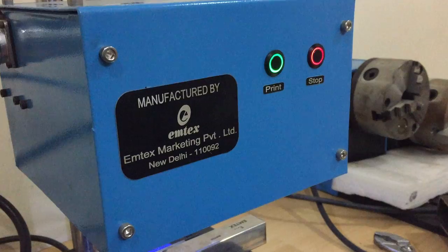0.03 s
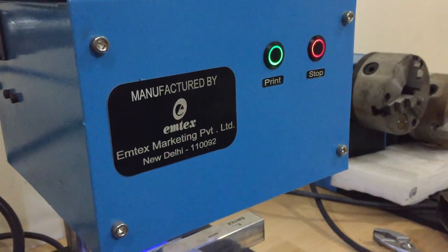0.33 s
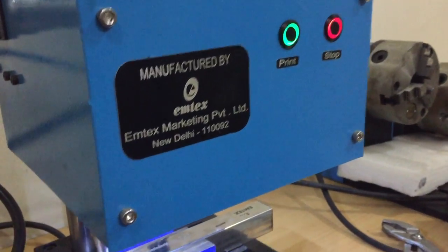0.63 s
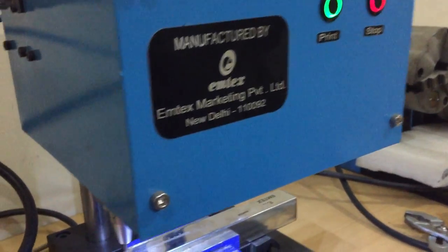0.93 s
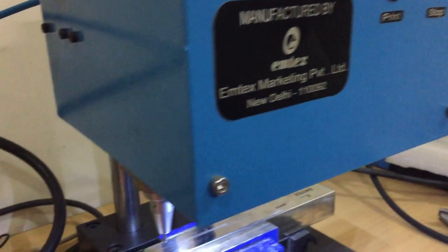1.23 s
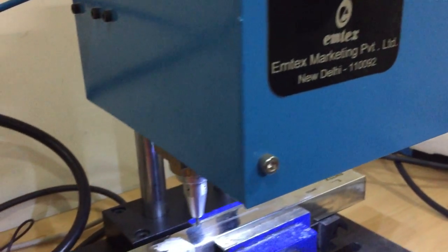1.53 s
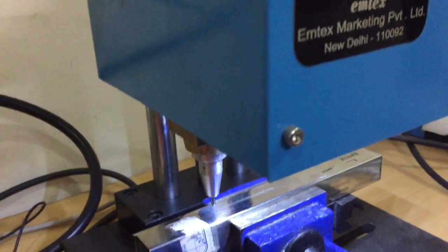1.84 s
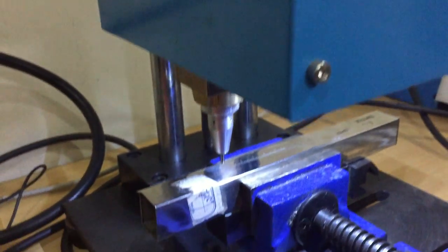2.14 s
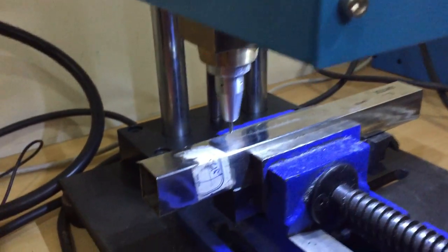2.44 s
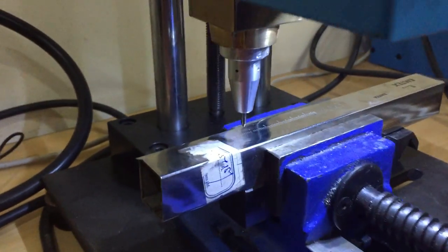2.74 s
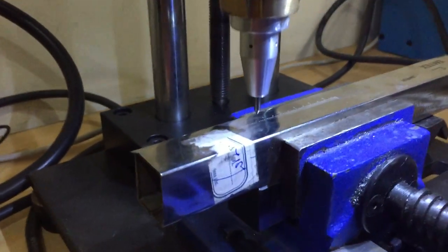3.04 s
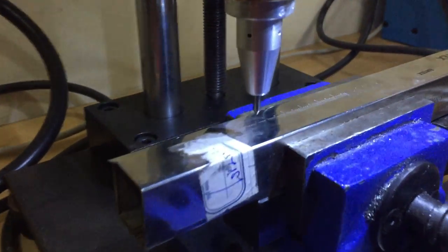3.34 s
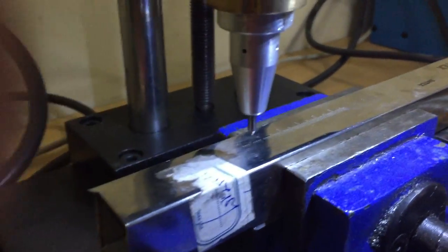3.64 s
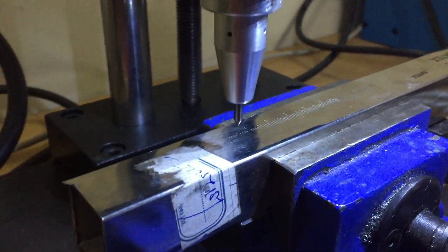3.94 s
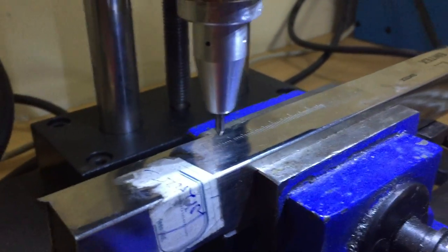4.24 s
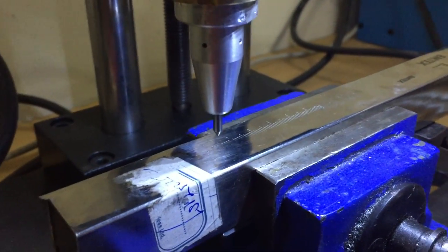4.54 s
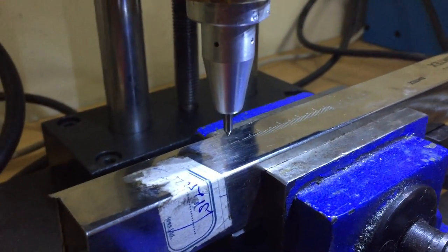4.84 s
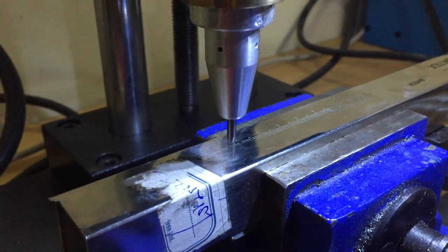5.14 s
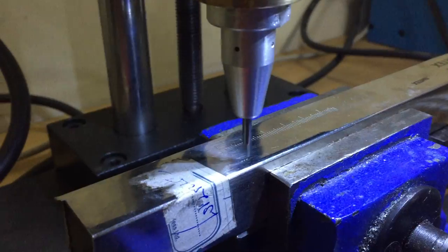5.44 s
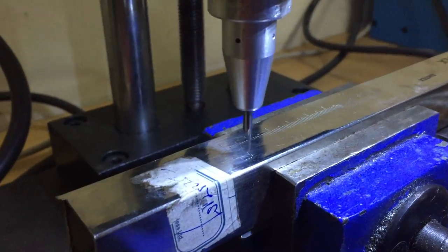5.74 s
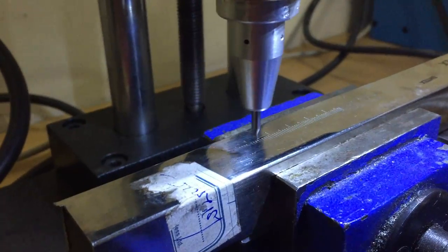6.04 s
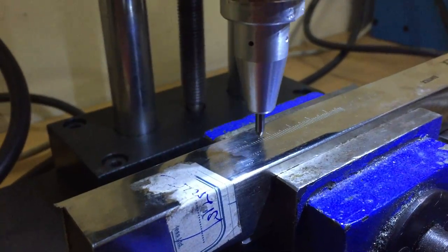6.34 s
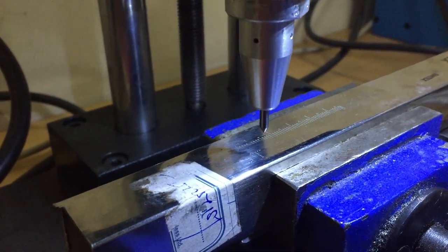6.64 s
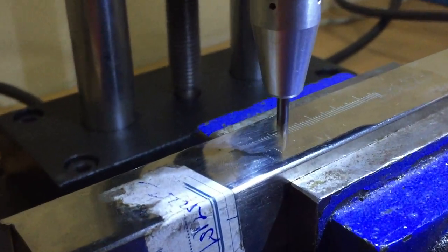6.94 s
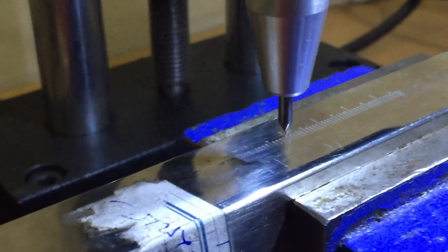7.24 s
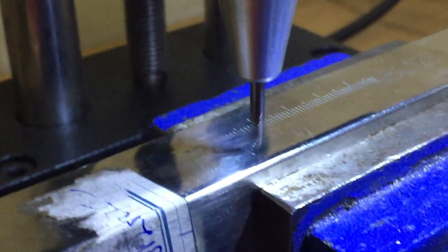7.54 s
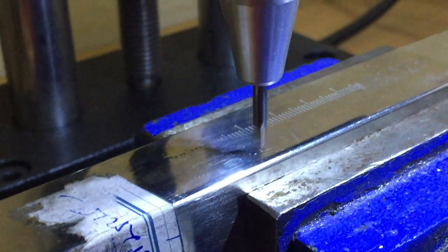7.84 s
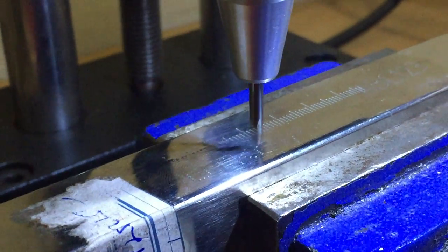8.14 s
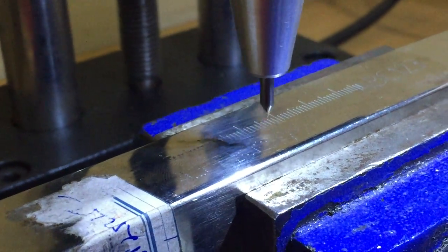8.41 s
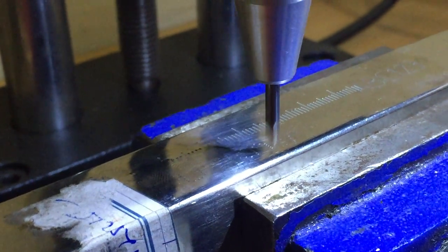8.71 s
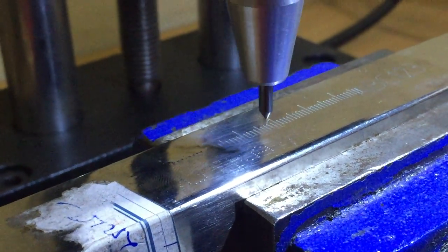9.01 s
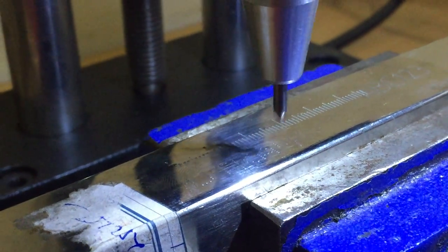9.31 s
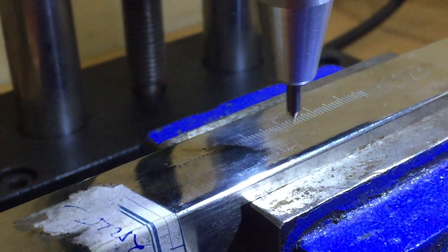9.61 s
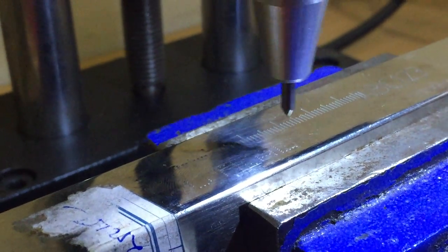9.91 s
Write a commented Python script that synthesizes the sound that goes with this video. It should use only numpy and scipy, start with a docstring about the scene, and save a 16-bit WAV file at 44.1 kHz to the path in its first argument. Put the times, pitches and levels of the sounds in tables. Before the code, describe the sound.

In a small workshop, a machine hums quietly with a soft fan rush and faint, high ticks. About halfway through, a sharp click sets off a pneumatic marking stylus, which hammers a steel tube in loud, rapid, buzzing bursts with a thin metallic ring. A motor whirrs softly between strokes, and puffs of air occasionally thump the close microphone as the hammering carries on to the end.

```python
"""Dot-peen marking of a steel tube

A pneumatic marker stands close to a phone in a small workshop. For five seconds it hums and ticks faintly.
Then its stylus hammers a tube held in a vice, in short strokes of about 150 blows a second. Each impact
excites the modes of the head and the tube and vents a pulse of air; some of it buffets the microphone."""
import sys
import numpy as np
from scipy import signal
from scipy.fft import rfft, irfft
from scipy.io import wavfile
from scipy.ndimage import uniform_filter1d

SR = 44100
rng = np.random.default_rng(int(sys.argv[2]) if len(sys.argv) > 2 else 0)


def write(x):
    x = np.atleast_2d(x).T
    wavfile.write(sys.argv[1], SR, np.round(np.clip(x, -1, 1) * 32767).astype(np.int16))


N = 439677
TIME = np.arange(N) / SR


def undb(db):
    """Amplitude ratio of a level in decibels."""
    return 10 ** (np.asarray(db) / 20)


def unit(x):
    """Normalisation to rms 1."""
    return x / np.sqrt(np.mean(x ** 2))


def spectrum_gain(points, hz):
    """Gain of a (f/Hz, level/dB) spectrum, interpolated over log frequency."""
    f, db = np.transpose(points)
    return undb(np.interp(np.log(hz), np.log(f), db))


def band(x, lo_hz, hi_hz, order=2):
    """Butterworth band-pass filter."""
    sections = signal.butter(order, [lo_hz, min(hi_hz, .49 * SR)], "band", fs=SR, output="sos")
    return signal.sosfilt(sections, x + 1e-18)


def convolve(x, response):
    """Convolution: the output of a linear system with this impulse response."""
    return signal.oaconvolve(x, response)[:N]


def impulses(times, sizes):
    """Impulse train: one-sample pushes at the given times."""
    return np.bincount((np.asarray(times) * SR).astype(int), sizes, N)[:N]


def repeats(groups, period_s):
    """Times and levels of the events in periodic (t/s, count, level/dB) groups."""
    return np.transpose([(s + k * period_s, db) for s, count, db in groups for k in range(round(count))])


def wander(rate_hz):
    """Low-pass random fluctuation with a spread near 1."""
    hold = int(SR / rate_hz)
    steps = np.repeat(rng.standard_normal(N // hold + 1), hold)
    return 1.18 * uniform_filter1d(uniform_filter1d(steps, hold), hold)[:N]


def shifting_filter(x, responses, rate_hz):
    """Time-varying system: a random, equal-power blend of impulse responses."""
    shares = np.array([wander(rate_hz) for _ in responses])
    shares = shares / np.linalg.norm(shares, axis=0)
    return sum(convolve(x * share, response) for share, response in zip(shares, responses))


def resonator(modes, broad=None, size=16384):
    """Modal superposition: a causal, unit-energy response of resonances on an optional broad spectrum."""
    hz = np.fft.rfftfreq(size, 1 / SR) + 1
    power = sum(undb(db) ** 2 / (1 + ((hz ** 2 - f ** 2) / (hz * width)) ** 2) for f, width, db in modes)
    if broad is not None:
        power = power + spectrum_gain(broad, hz) ** 2
    cepstrum = irfft(np.log(power))[:size // 2]  # the causal half gives minimum phase
    response = irfft(np.exp(rfft(cepstrum, size)))[:size // 2]
    return response / np.linalg.norm(response)


def approach(start_db, rise_db, approach_s=3.6):
    """Level rises with proximity as the phone nears the machine."""
    return start_db + rise_db * np.clip(TIME / approach_s, 0, 1)


def duck(db, fade_s=.25):
    """Attenuation that sets in as the hammering starts."""
    return undb(db * np.clip((TIME - MARKING_S) / fade_s, 0, 1))


# Spectrum of the workshop air: f/Hz, relative spectral level/dB
AIR_SPECTRUM = [(15, -52), (25, -43), (48, -13), (76, -24.5), (102, -10.5), (123, -16), (145, -12),
                (206, -17.5), (293, -19), (476, -26), (591, -20.5), (1290, -26.5), (2280, -32), (3400, -41),
                (4500, -52.5), (16000, -64)]
# Casing resonances that colour the fan rush: f/Hz, bandwidth/Hz, relative level/dB
FAN_MODES = [(820, 120, -3), (956, 43, 4), (1296, 150, -1.5), (2070, 240, -7)]


def fans(split_hz=450, flicker_db=.8, size=2 ** 19):
    """Broadband flow noise: a low rumble and a rush, partly filtered by the casing's resonances."""
    hz = np.fft.rfftfreq(size, 1 / SR) + 1e-3
    air = rfft(rng.standard_normal(size)) * spectrum_gain(AIR_SPECTRUM, hz)
    rumble, rush = (unit(irfft(air * side)[:N]) for side in (hz < split_hz, hz >= split_hz))
    casing = convolve(rng.standard_normal(N), resonator(FAN_MODES))
    casing = unit(band(casing, 500, 3000)) * undb(-4 + 2 * wander(70))
    rumble_gain = undb(approach(-42.5, 3.3) + flicker_db * wander(12))
    rush_gain = undb(approach(-48, 1.9) + flicker_db * wander(12)) * duck(-1)
    return rumble_gain * rumble + rush_gain * (rush + casing)


# Mains and fan tones: f/Hz, relative level/dB
HUM_TONES = [(100, -37), (158, -53.5), (286, -51.5), (338, -59.5), (593, -64), (988, -66)]


def hum(waver_db=1.0):
    """Periodic forcing by mains and fans gives fixed tones, each wavering in level."""
    tones = sum(undb(db + waver_db * wander(5.3)) * np.sin(2 * np.pi * (hz * TIME + rng.random()))
                for hz, db in HUM_TONES)
    return np.sqrt(2) * undb(approach(1.36, 2.85)) * tones


# Pitch of the motor: t/s, f/Hz
DRONE_PITCH = [(0.15, 75.9), (0.41, 75.9), (1.14, 81.7), (3.26, 74.7), (5.0, 73.2)]


def drone(db=-46.5, swell_db=11, swell_s=4.61, swell_width_s=.38):
    """Frequency modulation: a motor's low tone drifts in pitch, and swells just before the marking."""
    hz = np.interp(TIME, *np.transpose(DRONE_PITCH))
    swell = np.exp(-((TIME - swell_s) / swell_width_s) ** 2)
    gain = undb(db + swell_db * swell + 2 * wander(5.43))
    return np.sqrt(2) * gain * np.sin(2 * np.pi * np.cumsum(hz) / SR)


def hiss():
    """Band-limited noise of rms 1, the carrier of swishes and clicks."""
    return unit(band(rng.standard_normal(N), 1700, 10000, order=1))


# Soft brushing swishes: centre t/s, half-width/s, level/dB
SWISHES = [(.49, 0.059, -61), (1.42, 0.14, -66), (2.25, 0.17, -69), (4.691, 0.052, -62)]


def swishes():
    """Amplitude modulation: hiss under Gaussian envelopes sounds like brushing."""
    return hiss() * sum(undb(db) * np.exp(-((TIME - s) / width) ** 2) for s, width, db in SWISHES)


def high_blip(start_s=.133, db=-58, decay_s=.03):
    """One faint, very high blip of narrow-band noise at the start."""
    peaks = [(10400, 300, 0), (12900, 400, -8)]
    noise = unit(convolve(rng.standard_normal(N), resonator(peaks)))
    envelope = convolve(impulses([start_s], [undb(db)]), np.exp(-TIME[:SR // 5] / decay_s))
    return envelope * band(noise, 9500, 14000)


# Groups of faint ticks while the machine waits: start t/s, count, mean level/dB
TICK_GROUPS = [(2.0705, 4, -58), (2.4445, 3, -63), (2.7451, 2, -62), (3.0485, 7, -61.5), (3.6521, 1, -59),
               (3.8007, 1, -63), (4.026, 2, -62.5), (4.330, 2, -62), (4.5576, 1, -64)]


def ticks(period_s=.0753, decay_s=.026, scatter_db=1.5):
    """Resonant noise with an exponential decay gives dry, evenly paced ticks."""
    times, db = repeats(TICK_GROUPS, period_s)
    db = db + scatter_db * rng.standard_normal(len(times))
    modes = [(6450, 210, .5), (7400, 420, -6), (8900, 450, -6.5), (5500, 300, -11)]
    ring = unit(convolve(rng.standard_normal(N), resonator(modes)))
    return ring * convolve(impulses(times, undb(db)), np.exp(-TIME[:SR // 8] / decay_s))


# Clicks just before the first stroke: t/s, level/dB
CLICKS = [(4.781, -38), (4.9071, -60), (5.0408, -35), (5.0577, -19)]


def clicks(decay_s=.0087):
    """Broadband transients: hiss with a sudden onset and a fast exponential decay."""
    times, db = np.transpose(CLICKS)
    return hiss() * convolve(impulses(times, undb(db)), np.exp(-TIME[:SR // 8] / decay_s))


# Echo of the workshop by band: lower f/Hz, upper f/Hz, early level/dB, tail level/dB, tail T60/s
ROOM_BANDS = [(93, 565, -12, -5, 0.45), (720, 2230, -1, -5, 0.33), (2330, 12400, -11, -16, 0.52),
              (8860, 24000, -2.5, -22.5, 0.33)]


def room_response(build_s=.0011, early_t60_s=.042):
    """Reverberation: early reflections from bench and casing, then the diffuse tail of the room."""
    t = TIME[:int(.6 * SR)]
    onset = 1 - np.exp(-(t / build_s) ** 2)
    response = 0
    for lo_hz, hi_hz, early_db, tail_db, tail_t60_s in ROOM_BANDS:
        for db, t60_s in (early_db, early_t60_s), (tail_db, tail_t60_s):
            envelope = onset * undb(-60 * t / t60_s)
            reflections = band(envelope * rng.standard_normal(len(t)), lo_hz, hi_hz)
            response = response + undb(db) * reflections / np.linalg.norm(envelope)
    return response


# Exhaust air striking the microphone: t/s, slaps in a row, relative level/dB
GUSTS = [(5.065, 1, -10), (5.1255, 1, -14.5), (6.479, 1, -22), (6.884, 1, -18), (7.1539, 5, -12),
         (7.342, 1, -13), (8.271, 1, -19), (8.717, 2, -14), (8.797, 2, -17), (9.797, 1, -5),
         (9.8406, 1, -4), (9.8737, 1, -12), (9.886, 1, -4.5)]


def gusts(gap_s=.0187, start_hz=520, end_hz=58, glide_s=.0028, thud_s=.022, db=1, flutter_db=-9):
    """Dynamic pressure of a slug of air: a pop that sinks into a low thud, with a little flutter."""
    t = TIME[:SR // 10]
    phase = 2 * np.pi * np.cumsum(end_hz + (start_hz - end_hz) * np.exp(-t / glide_s)) / SR
    thud = np.sin(phase) * np.exp(-(t / thud_s) ** 2)
    times, slap_db = repeats(GUSTS, gap_s)
    slaps = impulses(times, undb(slap_db + db))
    flutter = convolve(slaps, np.exp(-t / glide_s)) * unit(band(rng.standard_normal(N), 310, 930, 1))
    return convolve(slaps, thud) + undb(flutter_db) * flutter


# Longer moves of the stepper motor: start t/s, duration/s, f/Hz, level/dB
STEPPER_MOVES = [(6.66, .16, 264, -40), (6.84, .31, 388, -36), (8.85, .11, 163, -36)]


def stepper_notes(ramp_s=.014, waver_db=2.0):
    """Periodic stepping: on a longer move the motor holds one soft note."""
    notes = 0
    for s, length, hz, db in STEPPER_MOVES:
        gate = np.clip(np.minimum(TIME - s, s + length - TIME) / ramp_s, 0, 1)
        notes = notes + undb(db) * gate * np.sin(2 * np.pi * hz * TIME)
    return notes * undb(-waver_db * wander(40))


def stepper_whirrs(hz=470, spread=.06, fall=.11, lag_s=.011, length_s=.01, db=-30):
    """A falling chirp: after each stroke the motor shifts the head, slowing a little as it goes."""
    t = TIME[:SR // 20]
    progress = (t - lag_s) / length_s
    whirrs = np.zeros(N + len(t))
    for s, count, *_ in strokes():
        detune, size = rng.standard_normal(2)
        start = min(int((s + count * BLOW_GAP_S) * SR), N)
        phase = 2 * np.pi * np.cumsum(hz * (1 + spread * detune - fall * progress)) / SR
        whirrs[start:start + len(t)] += undb(db + 2 * size) * np.exp(-progress ** 2) * np.sin(phase)
    return whirrs[:N] * (1 + .5 * wander(200))


# Runs of evenly spaced strokes: start t/s, strokes, period/s, blows per stroke,
# blows in the last stroke, relative level/dB, relative tube level/dB
STROKE_RUNS = [(5.0644, 2, 0.059, 4, 4, -15, 1.5), (5.1792, 4, 0.053, 3, 4, -15, 2),
               (5.406, 2, 0.066, 4, 4, -14, 3), (5.5409, 2, 0.068, 3, 4, -15, 12),
               (5.6688, 5, 0.054, 3, 3, -14.5, 5.5), (5.9858, 3, 0.066, 3, 4, -15.5, 10),
               (6.1927, 2, 0.067, 4, 3, -15, 8), (6.3623, 6, 0.053, 3, 4, -14, 6),
               (6.8197, 7, 0.055, 4, 15, -15.5, 4.5), (7.3287, 4, 0.067, 3, 3, -17, 2),
               (7.6536, 3, 0.07, 4, 4, -16, 5), (7.8954, 5, 0.054, 3, 3, -15.5, 5),
               (8.1786, 1, 0, 21, 21, -16.5, 0), (8.358, 3, .0656, 3, 3, -16.5, -4),
               (8.5447, 4, .0541, 3, 20, -15, -0.5), (8.955, 3, .0667, 3, 3, -15, -4),
               (9.2234, 2, 0.054, 3, 3, -16.5, 8), (9.336, 2, 0.058, 4, 3, -16, 5),
               (9.4491, 3, .054, 3, 3, -15, 2), (9.6231, 3, .0668, 3, 21, -14, 2),
               (9.939, 1, 0, 4, 4, -17.5, -7)]
MARKING_S = STROKE_RUNS[0][0]
BLOW_GAP_S, LONG_STROKE_GAP_S = .0067, .00657


def strokes():
    """Periodic bursts: every stroke as (t/s, blows, level/dB, tube level/dB)."""
    return [(s + k * period, round(last if k == round(count) - 1 else each), db, tube_db)
            for s, count, period, each, last, db, tube_db in STROKE_RUNS for k in range(round(count))]


def blows(opening_db=9.5, settle_s=.12, sleeve_db_per_s=.88, scatter_db=1.73, jitter_s=.00008):
    """Quasi-periodic excitation: the time, gain, tube gain and sleeve gain of every blow."""
    rows = []
    for s, count, db, tube_db in strokes():
        tube_scatter_db, sleeve_scatter_db = rng.normal(0, [2.0, 1.1])
        elapsed = s - MARKING_S
        stroke_db = db + opening_db * np.exp(-elapsed / settle_s)  # the first strokes are loudest
        sleeve_db = -3.5 + sleeve_db_per_s * elapsed + sleeve_scatter_db
        gap_s = BLOW_GAP_S if count < 10 else LONG_STROKE_GAP_S
        rows += [(s + k * gap_s, stroke_db, tube_db + tube_scatter_db, sleeve_db) for k in range(count)]
    times, db, tube_db, sleeve_db = np.transpose(rows)
    scatter, jitter = rng.standard_normal((len(rows), 2)).T
    gain = undb(db + scatter_db * scatter) * np.sqrt(BLOW_GAP_S * SR)
    return times + jitter_s * jitter, gain, undb(tube_db), undb(sleeve_db)


def exhaust(times, gain, lag_s=.00337, width_s=.0011, db=-23):
    """Pulsating flow: the valve vents air after each blow, giving a stroke its low buzz."""
    pulse = np.exp(-((TIME[:SR // 100] - lag_s) / width_s) ** 2)
    return undb(db) * band(convolve(impulses(times, gain), pulse), 115, 900, order=1)


# Modes of the steel tube: f/Hz, relative level/dB
TUBE_MODES = [(5163, 0), (10355, -13), (12283, -15), (12511, -14)]


def tube(times, gain, db=-39, t60_s=.057, linger_db=-13, linger_t60_s=.21, blur_rad=.95):
    """Two-stage decay: the struck tube's ring drops quickly, then its lowest mode lingers."""
    t = TIME[:SR // 2]
    hits = impulses(times, gain)
    ring, linger = (convolve(hits, undb(-60 * t / decay)) for decay in (t60_s, linger_t60_s))
    # the touch of the point keeps nudging the phase
    tones = [undb(level) * np.sin(2 * np.pi * hz * TIME + blur_rad * wander(77))
             for hz, level in TUBE_MODES]
    return undb(db) * (ring * sum(tones) + undb(linger_db) * linger * tones[0])


def chatter(envelope):
    """Spectral whitening: a burst of micro-contacts that favours no pitch."""
    burst = envelope * rng.standard_normal(len(envelope))
    for _ in range(8):  # flatten the spectrum, then restore the envelope
        spectrum = rfft(burst, 2 * len(envelope))
        burst = irfft(spectrum / np.abs(spectrum))[:len(envelope)]
        burst = burst * envelope / np.sqrt(uniform_filter1d(burst ** 2, size=40) + 1e-12)
    return burst / np.linalg.norm(burst)


def impact(times, gain, db=-16, decay_s=.0039):
    """Contact transient: the sharp tick as the point meets the steel."""
    tick = chatter(np.exp(-TIME[:SR // 200] / decay_s))
    return undb(db) * band(convolve(impulses(times, gain), tick), 1800, 7000)


def contact_force(times, gain, contact_s=.00384, rattle_s=.0079, rattle_db=-12, drift_db=-7, loose_db=-3):
    """Intermittent contact: the point chatters on the steel for a few milliseconds at each blow."""
    t = TIME[:SR // 25]
    envelope = np.exp(-(t / contact_s) ** 4) + undb(rattle_db) * np.exp(-t / rattle_s)
    envelope = envelope / np.linalg.norm(envelope)
    hits = impulses(times, gain)
    # blows chatter much alike, but the pattern drifts as the point travels over the steel
    drift = shifting_filter(hits, [chatter(envelope) for _ in range(6)], rate_hz=9)
    # loose parts rattle differently every time
    loose = np.sqrt(np.abs(convolve(hits ** 2, envelope ** 2))) * rng.standard_normal(N)
    return convolve(hits, chatter(envelope)) + undb(drift_db) * drift + undb(loose_db) * loose


# Low modes of the casing and the vice: f/Hz, bandwidth/Hz, relative level/dB
CASING_MODES = [(326, 75, -20.5), (1010, 40, -3.5), (986, 32, -3), (1284, 85, -8), (1608, 20, -4),
                (1706, 56, -4.5), (1900, 110, -30), (2337, 134, -10.5)]
# Modes of the marking head: f/Hz, bandwidth/Hz, relative level/dB
HEAD_MODES = [(4610, 70, -13), (4750, 64, -12), (5700, 160, 3), (5850, 140, -3), (6545, 140, -7),
              (7130, 100, -9), (8245, 140, -1), (8910, 76, -8), (9090, 84, -6), (9560, 70, -8),
              (9880, 90, -6), (11100, 80, -9), (11805, 110, -4), (12710, 100, -6), (13540, 60, -7),
              (13745, 110, -4), (14830, 120, -6), (15970, 110, -11), (16680, 110, -7)]
# Broad crack of a blow between the modes: f/Hz, relative level/dB
CRACK_SPECTRUM = [(60, -57), (260, -19.5), (500, -9), (780, -16.5), (1200, -13), (2700, -14), (3700, -11.5),
                  (6200, -9), (7600, -13.5), (9500, -11), (11300, -15), (13300, -14.5), (15400, -23),
                  (17000, -14)]
# Modes of the stylus sleeve: f/Hz, bandwidth/Hz, relative level/dB
SLEEVE_MODES = [(3163, 100, 0), (3250, 110, -4)]


def stylus(times, gain, sleeve_gain, sleeve_db=-13):
    """Forced vibration: the contact force drives the modes of head, casing and sleeve."""
    force = contact_force(times, gain)
    head = convolve(force, resonator(CASING_MODES + HEAD_MODES, CRACK_SPECTRUM))
    sleeve = convolve(force * np.interp(TIME, times, sleeve_gain), resonator(SLEEVE_MODES))
    return head + undb(sleeve_db) * sleeve


def scene():
    """Superposition of the machine, its echo, the gusts and the background."""
    times, gain, tube_gain, sleeve_gain = blows()
    steel = stylus(times, gain, sleeve_gain) + tube(times, gain * tube_gain) + impact(times, gain)
    machine = steel + exhaust(times, gain) + stepper_whirrs() + stepper_notes()
    # the reflections shift as the hand-held phone moves
    echo = shifting_filter(machine, [room_response() for _ in range(4)], rate_hz=4)
    transients = gusts() + ticks() + clicks() + swishes() + high_blip()
    background = (hum() + drone()) * duck(-28) + fans()
    return (machine + echo + transients + background)[None]


def record(dry, start_s=.085, bass_hz=32, ceiling=1.1, top_hz=17200):
    """Band limiting and soft saturation in the phone, which opens after a moment of silence."""
    opened = dry * np.clip((TIME - start_s) * 1000, 0, 1)
    thinned = signal.sosfilt(signal.butter(3, bass_hz, "high", fs=SR, output="sos"), opened)
    rounded = thinned / (1 + (np.abs(thinned) / ceiling) ** 6) ** (1 / 6)
    return signal.sosfilt(signal.ellip(10, .2, 70, top_hz, fs=SR, output="sos"), rounded)


dry = scene()
out = record(dry)
write(out)
```